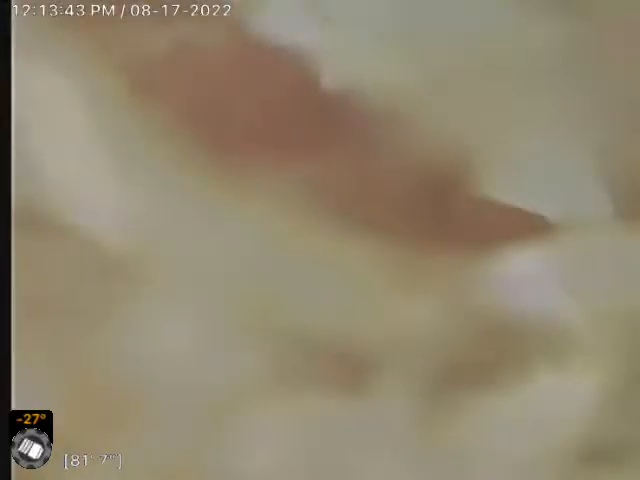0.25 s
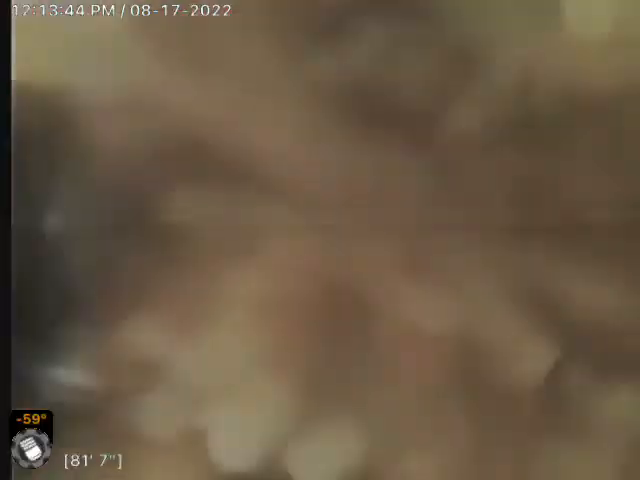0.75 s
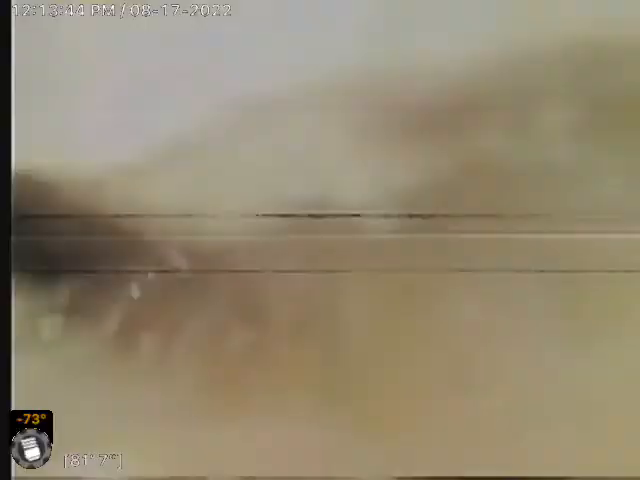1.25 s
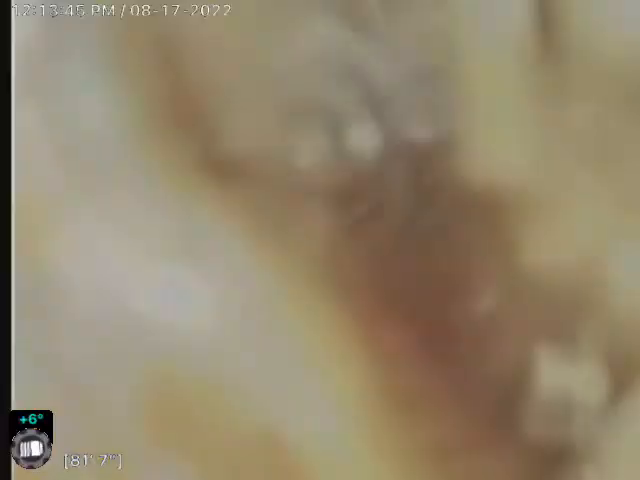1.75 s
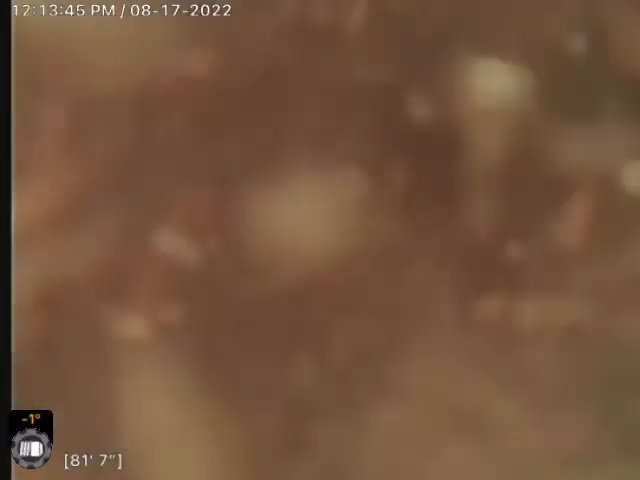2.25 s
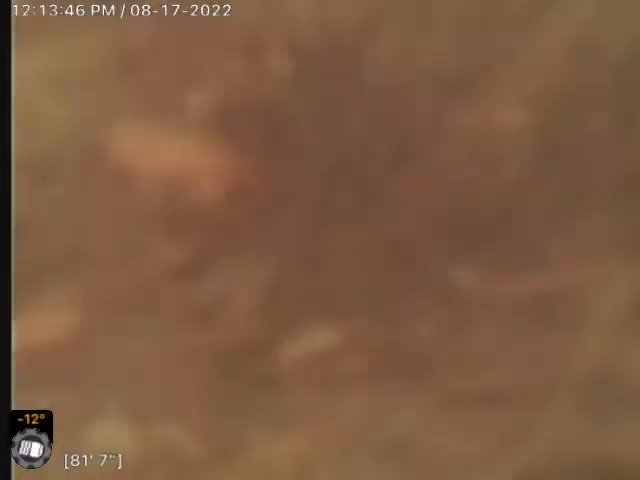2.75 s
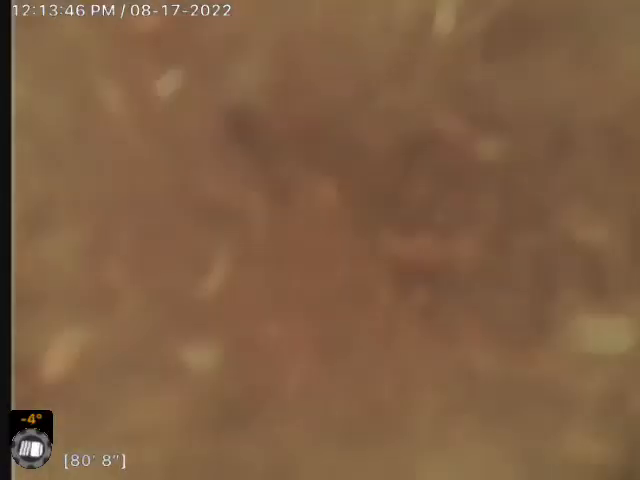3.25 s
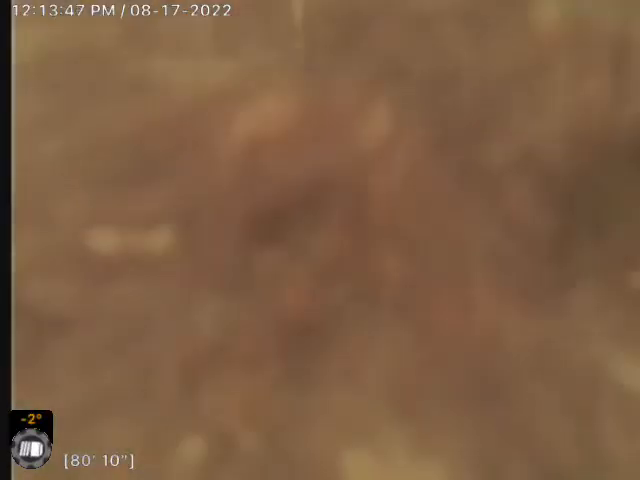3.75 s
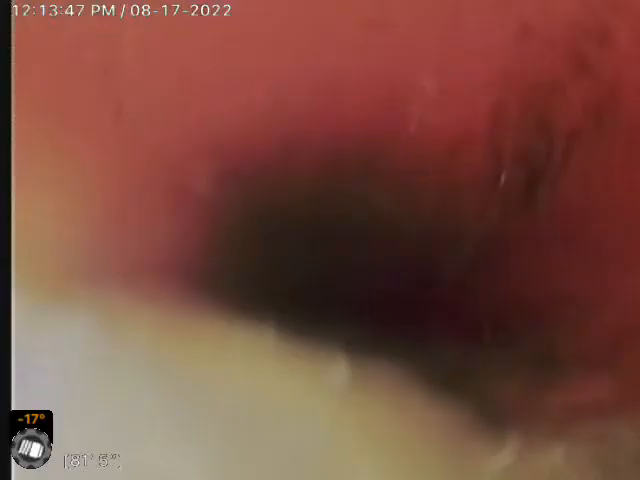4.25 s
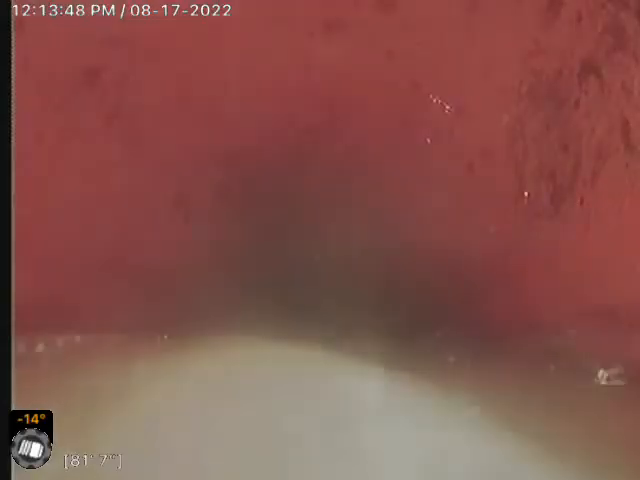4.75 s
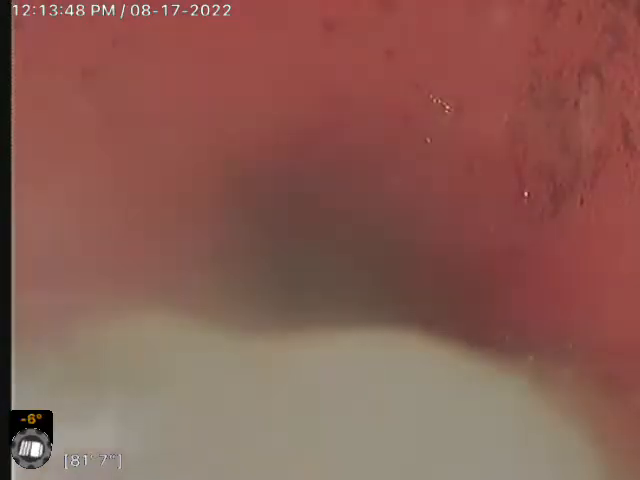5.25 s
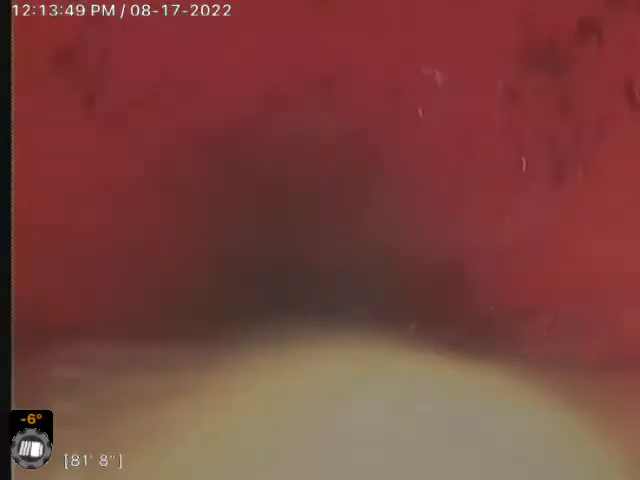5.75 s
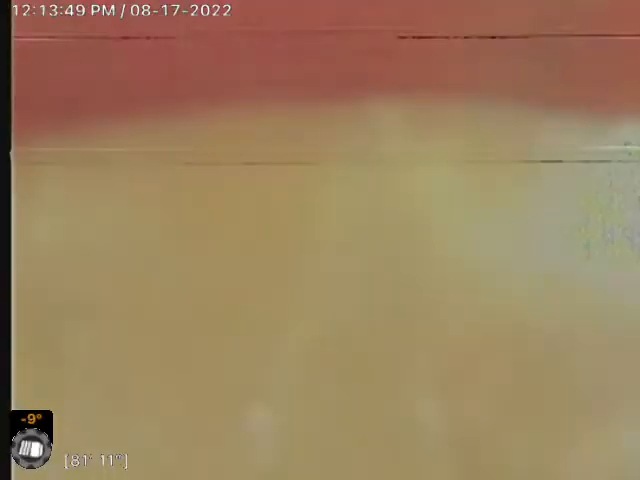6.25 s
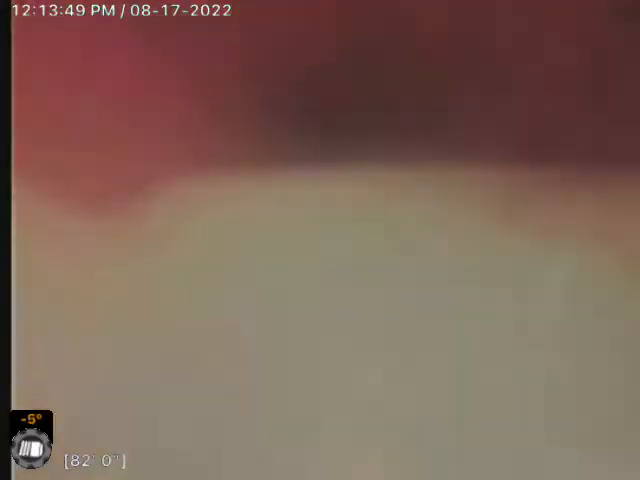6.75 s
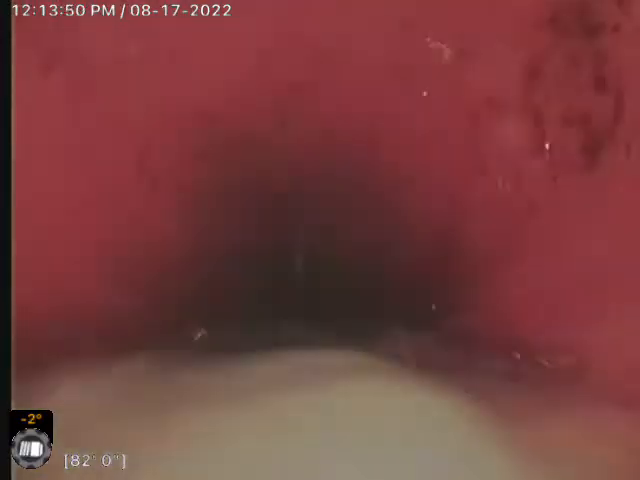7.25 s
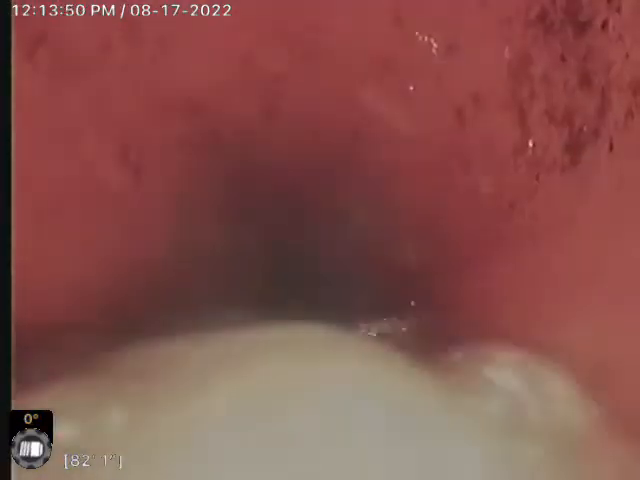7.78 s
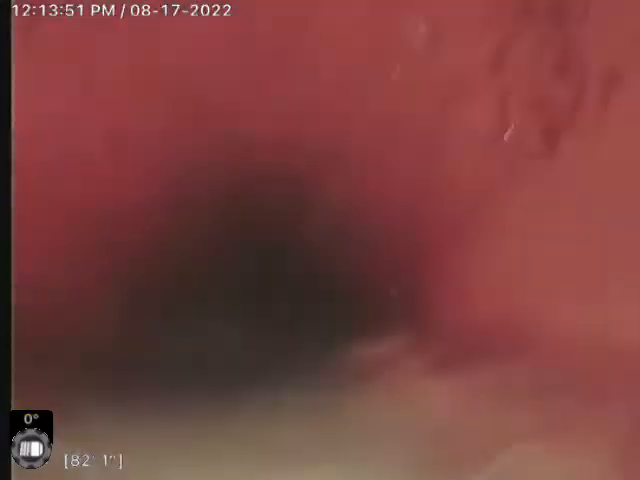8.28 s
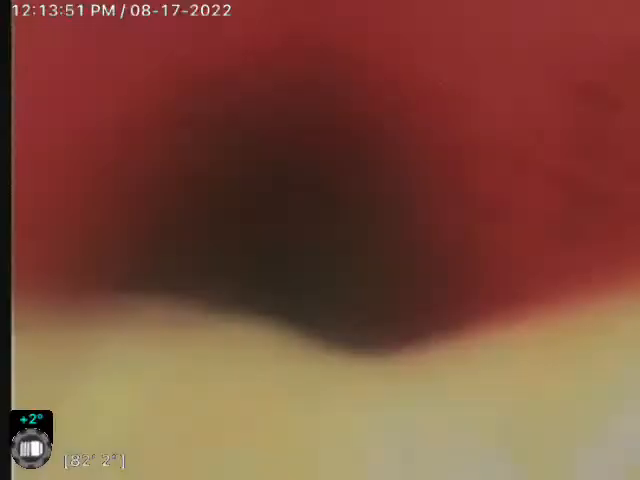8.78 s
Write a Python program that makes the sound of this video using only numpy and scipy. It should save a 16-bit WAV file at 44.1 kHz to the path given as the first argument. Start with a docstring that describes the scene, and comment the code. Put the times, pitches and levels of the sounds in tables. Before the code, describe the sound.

Irregular metallic clacks and hollow knocks from a push cable worked through a pipe, with hissing scrapes midway and faint rumble beneath.

```python
"""A stiff push cable is worked back and forth through a drain pipe, unwinding from a wire reel in a humming room.
It opens with coil chatter and a rub on the pipe; slaps on the reel and blows on its frame soon follow.
All are noise bursts or random contacts sent through resonances; a small hard room answers the reel.
Long scrapes over the rim, made of dense gritty contacts, come from 2.4 to 5.5 s; slaps and knocks then go on.
Hum (a wavering sine), slowly rising rumble and hiss lie under it all, with almost nothing above 7 kHz."""
import sys
import numpy as np
from scipy import signal
from scipy.fft import rfft, irfft, next_fast_len
from scipy.io import wavfile
from scipy.ndimage import uniform_filter1d, map_coordinates

SR = 44100
rng = np.random.default_rng(int(sys.argv[2]) if len(sys.argv) > 2 else 0)


def digitize_waveform(pressure):
    """Quantize a signal to 16-bit integers and store it at the path in sys.argv[1].

    Rows of a 2-D input are taken as channels; values are limited to [-1, 1].
    """
    field = np.atleast_2d(pressure).T
    bounded = np.clip(field, -1, 1)
    quanta = np.round(bounded * 32767).astype(np.int16)
    wavfile.write(sys.argv[1], SR, quanta)


N = 397782
TOP_HZ = 7000  # upper edge of the slaps and of the whole sound


def amp(db):
    """Decibels to gain."""
    return 10 ** (np.asarray(db) / 20)


def unit(x):
    """Scale to rms 1."""
    return x / np.sqrt(np.mean(x ** 2) + 1e-20)


def along(points, hz):
    """(Hz, value) points read on a log-frequency axis."""
    point_hz, value = np.transpose(points)
    return np.interp(np.log(hz + 1), np.log(point_hz + 1), value)


def swell(times_s, levels_db):
    """Gain through the given levels, held at -120 dB outside them."""
    return amp(np.interp(np.arange(N) / SR, times_s, levels_db, left=-120, right=-120))


def wobble(knots_per_s):
    """A smooth random curve through normally distributed knots."""
    knots = rng.standard_normal(int(N * knots_per_s / SR) + 4)
    return map_coordinates(knots, [np.arange(N) * knots_per_s / SR], order=2)


def filtered(x, response):
    """x times a response of frequency, padded against wrap-around."""
    size = next_fast_len(len(x) + 8192, True)
    spectrum = rfft(x, size) * response(np.fft.rfftfreq(size, 1 / SR))
    return irfft(spectrum, size)[:len(x)]


def causal(gain):
    """The minimum-phase response with this gain: it rings only after the blow."""
    cepstrum = irfft(np.log(np.maximum(gain, 1e-6)))
    half = len(cepstrum) // 2
    folded = np.r_[cepstrum[0], 2 * cepstrum[1:half]]
    return np.exp(rfft(folded, len(cepstrum)))


def grains(rate_per_s, spread_db):
    """Tiny contacts of either sign at random moments, a few much stronger than the rest."""
    hits = rng.random(N) < rate_per_s / SR
    sign = rng.choice([-1, 1], N)
    strength_db = spread_db * np.minimum(rng.standard_normal(N), 2)
    return unit(hits * sign * amp(strength_db))


def burst(t60_s, rise_s):
    """Noise of one contact: it builds as the surfaces meet, then dies."""
    t = np.arange(SR // 5) / SR
    build = 1 - np.exp(-t / rise_s)
    return rng.standard_normal(len(t)) * build * amp(-60 * t / max(t60_s, 0.01))


def add(track, start_s, sound, db):
    """Mix in a blow whose loudest 5 ms has the rms level db."""
    top = np.sqrt(uniform_filter1d(sound ** 2, size=220).max())
    part = track[max(round(start_s * SR), 0):][:len(sound)]
    part += amp(db) * sound[:len(part)] / top


# Resonances of the wire reel. Each row: centre in Hz, half-power width in Hz, mean peak level in dB.
REEL_MODES = [(508, 15, -1), (671.5, 44, -5), (773, 63, -5.5), (1029.3, 31, -4), (1164, 49.6, 1),
              (1322, 14, -4), (1536, 120, -6), (1693, 100, -6), (2293, 110, -7), (2694, 47, -9),
              (3120, 180, -13.5), (3680, 120, -13.5), (4640, 140, -17), (5500, 200, -29.5)]


def reel(hz, dead_db, vary_db=0):
    """Gain of the reel's resonances over a toneless share; each contact point favours different ones."""
    power = amp(2 * dead_db)
    for centre_hz, width_hz, db in REEL_MODES:
        mode_db = db + vary_db * rng.standard_normal()
        power = power + amp(2 * mode_db) / (1 + (2 * (hz - centre_hz) / width_hz) ** 2)
    return np.sqrt(power)


# Slaps of the cable on the reel. Each row: start in seconds, peak level in dB,
# thud in dB and snap in dB (tilts of the bass and treble, both relative to -10 dB).
SLAPS = [(0.3423, -22.5, -34.5, -12.5), (0.407, -28.5, -23.5, -24), (0.9173, -23, -12.5, -9.5),
         (1.0751, -32.5, -10.5, -11), (1.1917, -20.5, -26, -16), (1.2047, -26, -26.5, -16),
         (1.4575, -11.5, -8, -2.5), (1.568, -39, -20, -8.5), (1.732, -25, -12.5, -16.5),
         (1.7636, -23.5, -3.5, -15), (1.9447, -36, -7, -11.5), (1.993, -23, -16.5, -18),
         (2.0278, -14, -10.5, -12.5), (2.3583, -30.5, 1, -25), (2.432, -17, 0, 1), (3.182, -19, -2, -1.5),
         (3.3605, -21, 5, -14.5), (3.3815, -24, -32, -11), (3.401, -22, -22, -10.5),
         (3.4434, -27, -16.5, -23), (3.482, -26, -9.5, -22), (3.5034, -23.5, -4, -1),
         (3.7293, -21, -16.5, -13.5), (3.7998, -29, -8, -17), (3.8686, -26, -40, -15.5),
         (3.9882, -21, -21, -19.5), (4.0432, -24.5, -4, -15.5), (4.5299, -35, -6, -28.5),
         (5.232, -16.5, -1.5, -1), (5.2974, -21.5, -34, -9), (5.3647, -27.5, -1.5, -21),
         (5.7053, -23.5, -15.5, -11), (5.7204, -20.5, -16, -11), (5.9445, -23.5, -13, -17.5),
         (6.4315, -20, -13.5, -12.5), (6.6653, -21.5, -20, -15), (6.7279, -27.5, -11.5, -18),
         (6.9605, -22, -10, -13.5), (7.2797, -24.5, -15, -18), (7.297, -23, -7, -13.5),
         (7.7053, -18.5, -9.5, -8.5), (7.9018, -24.5, -15, -16), (7.9132, -22, -11.5, -13),
         (7.9629, -22.5, -4, -16.5), (8.0965, -28, 1.5, -18.5), (8.2538, -27, -6, -14.5),
         (8.2784, -29, -10, -14.5), (8.3584, -19, -18.5, -20.5), (8.567, -24, -9.5, -20.5),
         (8.8503, -15, -10, -12), (8.889, -25.5, -8.5, -16.5), (8.959, -21.5, -16, -9)]
# Colour shared by the slaps. Each row: frequency in Hz, gain in dB.
SLAP_COLOUR = [(100, -1), (250, 1.5), (600, -2.5), (1200, -3), (2400, 4.5), (4000, -0.5), (5800, -6.5),
               (7000, -9.5)]
SLAP_T60_S, SNAP_HALVES_DB = 0.041, 21.5  # ring at 0 dB snap; this much more snap halves the ring
RISE_SHARE = 0.023  # time constant of the build-up, as a part of t60


def clicks():
    """The cable slaps the reel; heavy slaps thud, hard ones snap, and short ones start most sharply."""
    out = np.zeros(N)
    for start_s, db, thud_db, snap_db in SLAPS:
        t60_s = SLAP_T60_S * 2 ** (-snap_db / SNAP_HALVES_DB)
        weight = [(600, thud_db + 10), (1100, 3), (1500, 2.5), (2600, -3), (4800, snap_db + 10)]

        def colour(hz):
            tone = amp(along(SLAP_COLOUR, hz) + along(weight, hz))
            low_pass = 1 / (1 + (hz / TOP_HZ) ** 20)
            return causal(tone * reel(hz, dead_db=-8.5, vary_db=3) * low_pass)

        slap = burst(t60_s, rise_s=t60_s * RISE_SHARE)
        add(out, start_s, filtered(slap, colour), db)
    return out


# Duller blows. Each row: start in seconds, peak level in dB, share of hollow pipe colour in dB.
BLOWS = [(0.3388, -20.5, -22), (1.0732, -22.5, 16), (1.2506, -27.5, -18), (1.9982, -22.5, -10),
         (2.5945, -38, 21), (2.894, -40, -22), (3.3611, -22.5, 25), (3.8024, -27, 6.5), (3.8734, -29, 17),
         (4.0845, -26.5, -5.5), (4.6788, -32, -24), (5.6434, -26.5, -26), (5.8027, -25, 16),
         (5.9556, -23, -35), (6.4924, -22, -13), (6.6836, -22.5, 0.5), (6.7331, -24, -2),
         (7.297, -15.5, -31), (7.347, -20, -18), (7.7716, -15.5, -1.5), (7.946, -22.5, -11),
         (7.9706, -23, -17), (8.099, -24, -28), (8.2888, -23.5, -10), (8.4226, -19.5, -9),
         (8.613, -19, -16), (8.968, -23, -5)]
# Colour of the reel frame. Each row: frequency in Hz, gain in dB.
FRAME_COLOUR = [(300, -16), (750, -20.5), (1050, -0.5), (1250, -0.5), (1700, -18.5), (3000, -19.5),
                (7000, -54)]
# Colour of the hollow pipe, also heard in the rubs. Each row: frequency in Hz, gain in dB.
PIPE_COLOUR = [(150, -21.5), (320, -1), (520, -4), (800, 0), (1000, -3.5), (1600, -19), (4000, -43.5)]
KNOCK_T60_S = 0.066


def knocks():
    """Dull blows ring the frame's main resonances, with more or less of the hollow pipe."""
    out = np.zeros(N)
    for start_s, db, hollow_db in BLOWS:

        def colour(hz):
            tone = amp(along(FRAME_COLOUR, hz)) + amp(along(PIPE_COLOUR, hz) + hollow_db)
            return causal(tone * reel(hz, dead_db=-15, vary_db=6.5))

        blow = burst(KNOCK_T60_S, rise_s=0.001)
        add(out, start_s, filtered(blow, colour), db)
    return out


# Shoves of the cable that set the coils chattering. Each row: start in seconds, end in seconds, level in dB.
CABLE_SHOVES = [(0, 0.039, -38), (0.338, 0.534, -38), (.92, 1.098, -35.5), (1.199, 1.313, -33),
                (1.38, 1.465, -37), (1.719, 1.78, -39), (1.996, 2.095, -36), (2.358, 2.411, -40),
                (2.545, 2.874, -49.5), (3.183, 3.242, -47), (3.386, 3.473, -35.5), (3.744, 3.898, -38.5),
                (3.998, 4.071, -31.5), (4.52, 4.529, -44.5), (4.767, 4.853, -47.5), (5.139, 5.249, -38),
                (5.325, 5.375, -30), (5.72, 5.84, -34), (5.94, 6.05, -30.5), (6.442, 6.565, -36.5),
                (6.668, 6.738, -31.5), (7.028, 7.073, -39.5), (7.186, 7.225, -37), (7.29, 7.335, -29.5),
                (7.681, 7.827, -33), (7.928, 8.077, -34.5), (8.268, 8.463, -35.5), (8.573, 8.649, -27),
                (8.963, 9.024, -30.5)]
RISE_DB_PER_S, SETTLE_DB_PER_S = 449.5, 98  # into the start of a shove, and after its end
IDLE_DB = -57  # floor between shoves


def chatter_level():
    """Level of the coils in dB: each shove brings a quick rise, a hold and a slower settling."""
    t = np.arange(N) / SR
    level_db = np.full(N, float(IDLE_DB))
    for start_s, end_s, db in CABLE_SHOVES:
        before_db = RISE_DB_PER_S * np.maximum(start_s - t, 0)
        after_db = SETTLE_DB_PER_S * np.maximum(t - end_s, 0)
        level_db = np.maximum(level_db, db - before_db - after_db)
    return level_db


# Colour of the coils. Each row: frequency in Hz, gain in dB.
COIL_COLOUR = [(150, -14), (400, -4), (750, -1.5), (1050, 5.5), (1600, -1.5), (3000, -3), (5000, -6.5),
               (7000, -15)]
CONTACTS_PER_S, CONTACT_SPREAD_DB = 90, 4  # mean rate for each loop, and unevenness


def coils(chatter_db, count=6):
    """Several loops of cable chatter on the reel in uneven flurries, each with its own ring."""
    def colour(hz):
        return causal(amp(along(COIL_COLOUR, hz)) * reel(hz, dead_db=-21, vary_db=3.5))

    loops = np.zeros(N)
    for _ in range(count):
        ring = filtered(signal.unit_impulse(SR // 10), colour)
        flurries = amp(2.6 * wobble(22))
        contacts = grains(CONTACTS_PER_S, CONTACT_SPREAD_DB) * flurries
        loops += unit(signal.oaconvolve(contacts, ring)[:N])
    return patchy(rippled(loops), depth_db=3) * amp(chatter_db)


# Rubs of the bowed cable. Each row: start in seconds, end in seconds, level in dB, groan in Hz.
PIPE_RUBS = [(0.026, 0.586, -47.5, 512), (0.906, 1.124, -36.5, 766), (0.93, 1.01, -37.5, 516),
             (1.201, 1.303, -38, 735), (1.759, 1.832, -34.5, 478), (2.002, 2.054, -28.5, 510),
             (2.531, 2.614, -32.5, 724), (3.138, 3.21, -38.5, 726), (3.305, 3.384, -34.5, 656),
             (3.8, 3.909, -36, 707), (5.747, 5.882, -32, 629), (6.494, 6.593, -36, 634),
             (7.324, 7.39, -32.5, 830), (7.749, 7.849, -31, 702), (7.901, 7.975, -28.5, 634),
             (8.37, 8.535, -30.5, 686)]


def rubbing():
    """The bowed cable sticks and slips on the pipe wall; each bow rattles and groans at its own resonance."""
    out = np.zeros(N)
    slips = grains(700, spread_db=3)
    for start_s, end_s, db, groan_hz in PIPE_RUBS:
        span = slice(max(int((start_s - 0.02) * SR), 0), int((end_s + 0.07) * SR))
        rattle = filtered(slips[span], lambda hz: causal(amp(along(PIPE_COLOUR, hz)) * reel(hz, dead_db=-13)))
        groan = filtered(slips[span], lambda hz: 1 / (1 + ((hz - groan_hz) / 22) ** 2))
        times_s = [start_s - 0.015, start_s + 0.012, end_s - 0.01, end_s + 0.065]
        pressure = swell(times_s, [db - 5.5, db, db, db - 17.5])
        out[span] += pressure[span] * unit(unit(rattle) + 0.8 * unit(groan))
    return out


# Long slides over the pipe's rim. Each row: start in seconds, crest in seconds, end in seconds, crest gain in dB.
RIM_SLIDES = [(2.45, 2.6, 3.4, -32.5), (3.066, 3.19, 3.7, -33), (4.726, 4.834, 4.9, -48),
              (5.052, 5.284, 5.45, -33.5)]
# Colour of the cable on the rim. Each row: frequency in Hz, gain in dB.
RIM_COLOUR = [(120, -8.5), (250, 12.5), (750, 9.5), (1000, 4), (1400, 2.5), (2500, 3), (4500, 0.5),
              (5600, -2.5), (7000, -13)]


def scraping():
    """On a long pull the cable hisses over the gritty rim: dense contacts under a swelling, unsteady gain."""
    speed = np.zeros(N)
    for start_s, crest_s, end_s, db in RIM_SLIDES:
        speed += swell([start_s, start_s + 0.067, crest_s, end_s], [db - 28.5, db - 4, db, db - 24])
    grit = filtered(grains(2600, spread_db=4), lambda hz: amp(along(RIM_COLOUR, hz)))
    return speed * patchy(rippled(grit), depth_db=1.6) * amp(wobble(42))


def nearby(x, share, count=14):
    """Hard surfaces close by add quick echoes that ripple the spectrum."""
    out = x.copy()
    delays_s = rng.uniform(0.0006, 0.012, count)
    signs = rng.choice([-1, 1], count)
    for delay_s, sign in zip(delays_s, signs):
        lag = int(delay_s * SR) + 1
        out[lag:] += share * sign / np.sqrt(count) * x[:-lag]
    return out


def rippled(x):
    """The short waves of the treble bounce off small things nearby; the bass bends round them."""
    treble = filtered(x, lambda hz: 1 - 1 / (1 + (hz / 1800) ** 4))
    return unit(x - treble + nearby(treble, share=0.75))


def patchy(x, depth_db):
    """The colour of a rustle keeps shifting, in patches a few hundred Hz wide."""
    z = signal.stft(x, nperseg=512)[2]
    field = uniform_filter1d(rng.standard_normal(z.shape), size=4, axis=0)  # over frequency
    field = uniform_filter1d(field, size=7, axis=1)  # over time
    return unit(signal.istft(z * amp(depth_db * unit(field)), nperseg=512)[1][:N])


# Decay of the room. Each row: frequency in Hz, t60 in seconds.
WALL_DECAY = [(200, 0.55), (1200, 0.26), (4000, 0.27), (7000, 0.23)]
ROOM_DB = -10.5  # gain of the echo


def room(x):
    """Hard walls answer after 6 ms with a decaying noise tail; the bass rings longest."""
    hz, t, z = signal.stft(rng.standard_normal(SR // 2), SR, nperseg=256)
    decay = amp(-60 * t / along(WALL_DECAY, hz)[:, None])
    tail = signal.istft(z * decay, SR, nperseg=256)[1]
    response = np.r_[np.zeros(round(0.006 * SR)), tail / np.linalg.norm(tail)]
    return signal.fftconvolve(x, response)[:N]


# Level of the low hum. Each row: time in seconds, level in dB.
HUM_LEVEL = [(0, -42), (0.85, -37.5), (1.1, -46), (5.0, -52.5), (7.3, -49.5), (7.52, -36.5), (7.8, -46),
             (9.02, -52.5)]
# Colour of the rumble and the hiss. Each row: frequency in Hz, gain in dB.
AIR_COLOUR = [(20, -35), (36, -13.5), (55, -2), (100, 1), (130, -5), (175, -2), (230, -6.5), (370, -8.5),
              (560, -18), (1100, -27), (2000, -28.5), (4800, -29.5), (6200, -32), (7000, -44)]
RUMBLE_START_DB, RUMBLE_GROWS_DB_PER_S = -43.5, 0.6071  # gain of the rumble


def background(chatter_db):
    """A wavering low hum and rising rumble, under a faint uneven hiss that lifts a little with the chatter."""
    t = np.arange(N) / SR
    hum_db = np.interp(t, *np.transpose(HUM_LEVEL))
    hum_hz = 73 + 5 * wobble(14)
    hum = np.sin(2 * np.pi * np.cumsum(hum_hz) / SR) * amp(2.6 * wobble(14))

    air = unit(filtered(rng.standard_normal(N), lambda hz: amp(along(AIR_COLOUR, hz))))
    rumble = filtered(air, lambda hz: 1 / (1 + (hz / 600) ** 4))
    rumble_db = RUMBLE_START_DB + RUMBLE_GROWS_DB_PER_S * t

    hiss = patchy(rippled(air - rumble), depth_db=2.4)
    hiss_db = -46 + 0.12 * (chatter_db - chatter_db.mean()) + wobble(11)
    return unit(hum) * amp(hum_db) + rumble * amp(rumble_db) + hiss * amp(hiss_db)


def scene():
    """Blows and chatter with their echo, rubbing and scraping, in the humming room."""
    chatter_db = chatter_level()
    reel_sounds = clicks() + knocks() + coils(chatter_db)
    echo = amp(ROOM_DB) * room(reel_sounds)
    return (reel_sounds + echo + rubbing() + scraping() + background(chatter_db))[None]


def record(dry):
    """The deepest bass is weak, and the treble falls away steeply above 6.5 kHz."""
    band = [(18, -24), (40, 0), (TOP_HZ - 500, 0), (TOP_HZ, -11), (TOP_HZ + 450, -60), (TOP_HZ + 900, -120)]
    return filtered(dry[0], lambda hz: amp(along(band, hz)))[None]


dry = scene()
out = record(dry)
digitize_waveform(out)
```